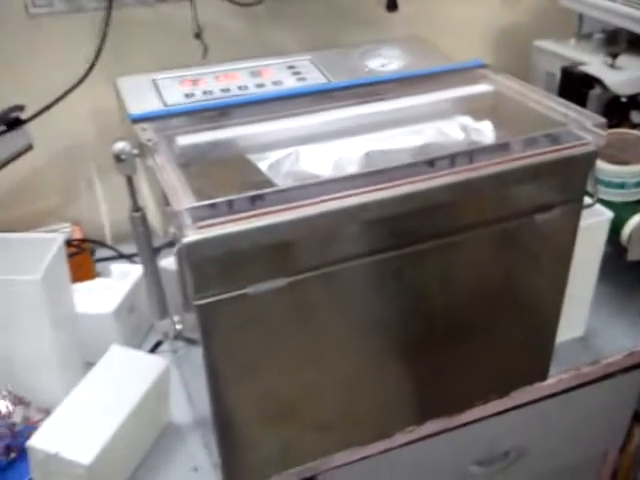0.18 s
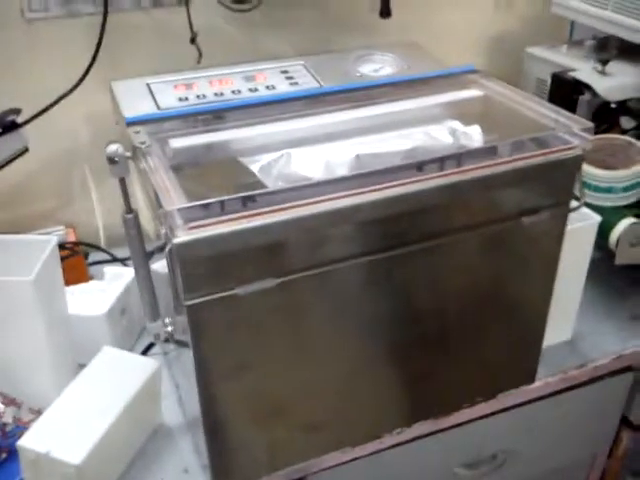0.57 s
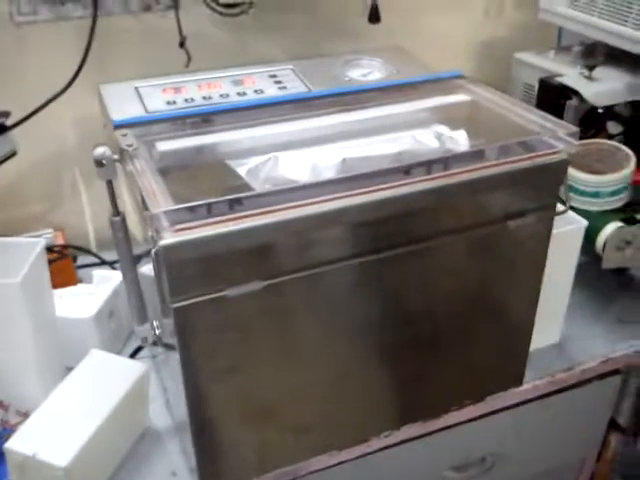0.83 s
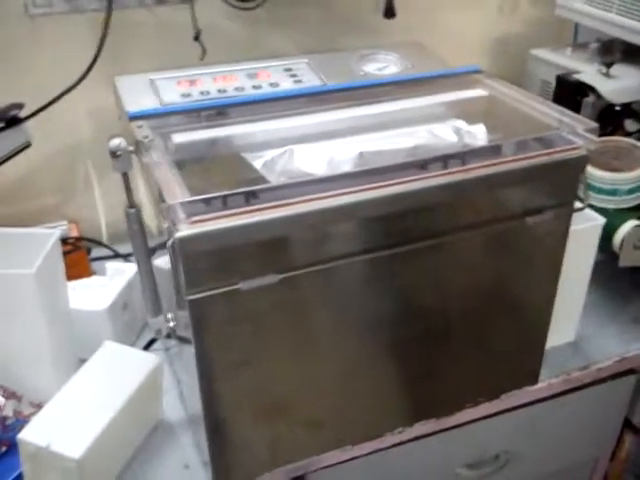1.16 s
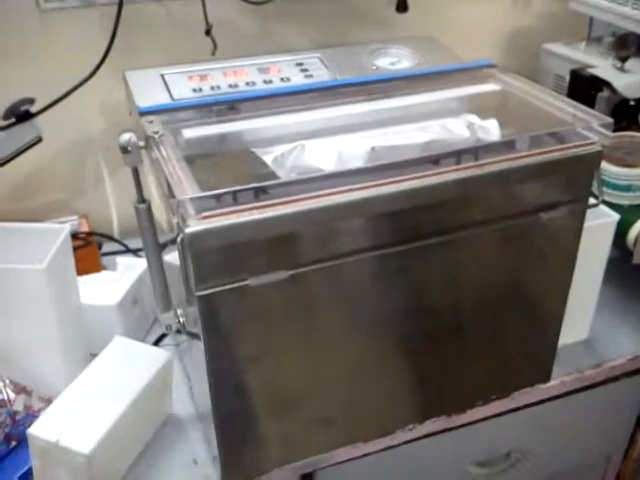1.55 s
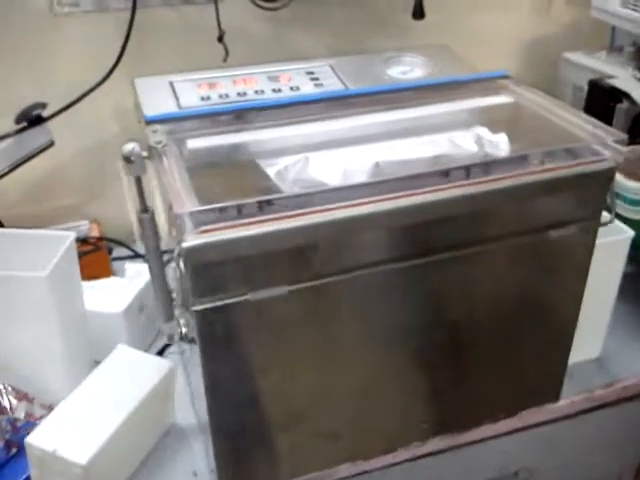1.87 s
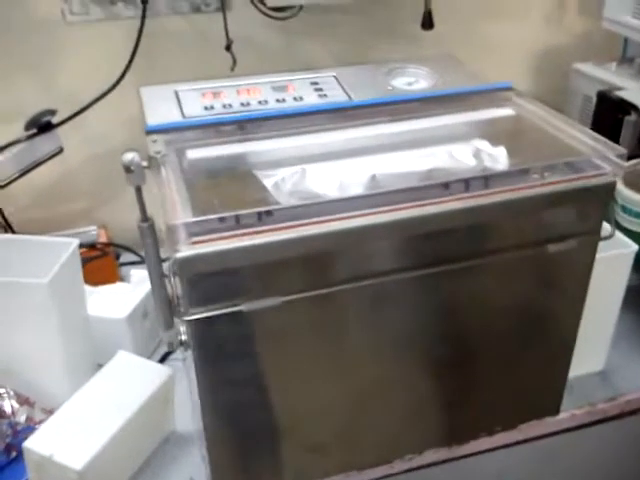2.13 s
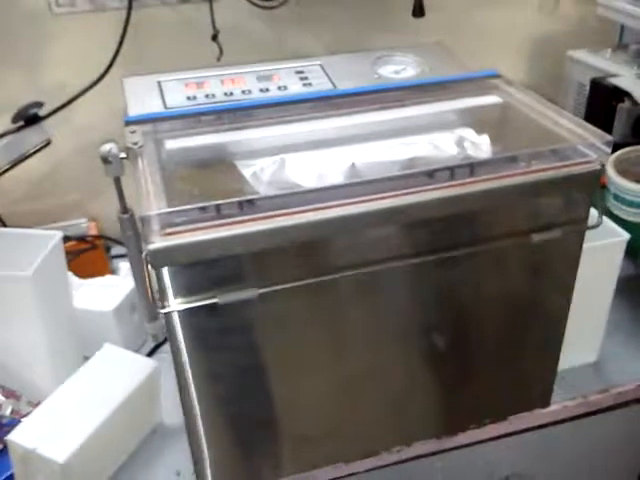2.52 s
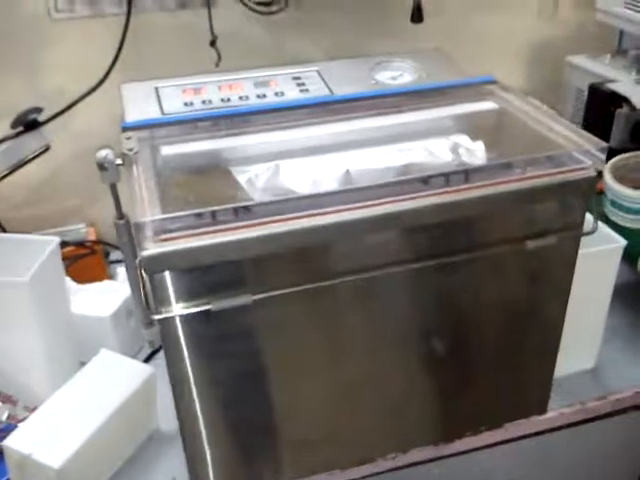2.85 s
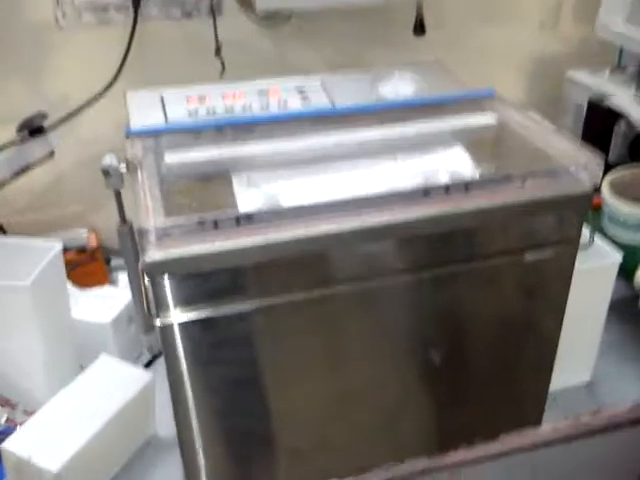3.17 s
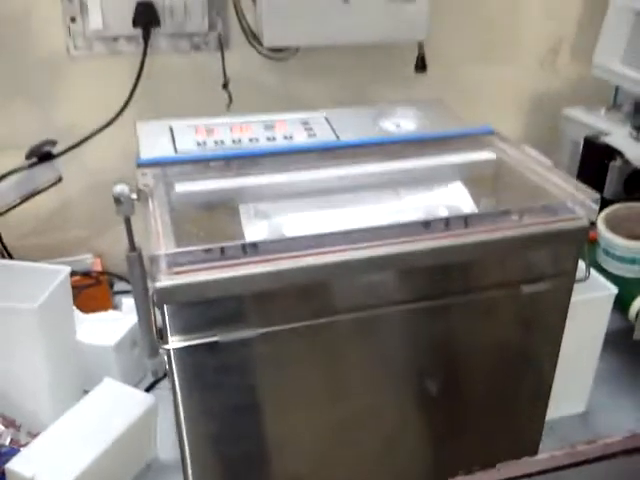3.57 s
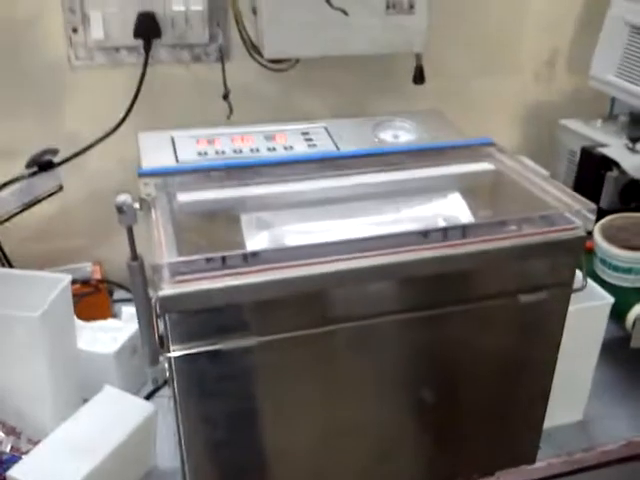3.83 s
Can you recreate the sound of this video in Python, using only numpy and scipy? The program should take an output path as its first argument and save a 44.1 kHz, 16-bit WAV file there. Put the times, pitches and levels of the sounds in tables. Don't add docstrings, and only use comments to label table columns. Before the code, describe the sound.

Vacuum machine's valve slams open late, with a sharp rattling crack and short metallic ring, then harsh, resonant air hiss continuing to the end; before it only low room hum. Small hard-walled workshop, one nearly mono microphone.

```python
import sys
import numpy as np
from scipy import signal
from scipy.fft import rfft, irfft
from scipy.io import wavfile
from scipy.ndimage import uniform_filter1d

SR = 44100
rng = np.random.default_rng(int(sys.argv[2]) if len(sys.argv) > 2 else 0)


def generate_wav(signal):
    frames = np.transpose(np.atleast_2d(signal))
    scaled = np.clip(frames, -1, 1) * 32767
    pcm = np.round(scaled).astype(np.int16)
    wavfile.write(sys.argv[1], SR, pcm)


def level_to_linear(level):
    exponent = np.asarray(level, float) / 20
    return 10 ** exponent


N = 176400
T = np.arange(N) / SR
HZ = np.fft.rfftfreq(N, 1 / SR)
PUSH_S, SLAM_S, BLOW_S = 2.895, 2.9073, 2.9074


def evened(x):
    return x / np.sqrt(np.mean(x ** 2) + 1e-20)


def read(points, hz):
    f, value = np.transpose(points)
    return np.interp(np.log(hz + 1), np.log(f + 1), value)


def coloured(gain):
    return evened(irfft(rfft(rng.standard_normal(N)) * gain, N))


def wander(rate_hz):
    return coloured(1 / (1 + (HZ / rate_hz) ** 2))


def crack():
    # f/Hz, density/dB per Hz
    spectrum = [(80, -11.5), (400, -7), (1000, -2), (3650, 1), (5560, -9), (7250, -8), (11500, -21.5),
                (15000, -11)]
    # f/Hz, T60/s
    decay = [(100, 1), (400, 0.88), (1000, 0.14), (4000, 0.084), (12000, .08)]
    # delay/s, level/dB
    rattle = [
        (.0032, -8.5),
        (0.008, -35),
        (0.025, -15),
        (.043, -13),
    ]
    level_db = -16
    t = np.maximum(T - BLOW_S, 0)
    out = np.zeros(N)
    for hz in np.geomspace(90, 16000, num=12):
        band = np.exp(-(np.log((HZ + 1) / hz) / .35) ** 2)
        gain = band * level_to_linear(read(spectrum, HZ) + level_db)
        noise = irfft(rfft(rng.standard_normal(N)) * gain, N)
        t60_s = read(decay, hz)
        for delay_s, db in [(0, 0), *rattle]:
            late = np.maximum(t - delay_s, 0)
            rise = np.minimum(late * hz, 1)
            out += noise * rise * level_to_linear(db - 60 * late / t60_s)
    return out


def pressure_pulse():
    level_db, length_s = -18, .0004
    x = np.maximum(T - BLOW_S, 0) / length_s
    return -level_to_linear(level_db) * x * (2 - x) * np.exp(1 - x)


def cabinet():
    # f/Hz, level/dB, T60/s, rise/s
    modes = [(112.5, -39, 0.36, 0.03), (152.5, -33, 0.49, 0.0031), (220, -33, .3, 0.025),
             (260.7, -28.5, 0.21, 0.0062), (377, -35, 0.15, 0.0025), (504, -34.5, 0.18, 0.006),
             (584.7, -26, 0.18, 0.021), (808, -26.5, 0.15, 0.0016), (912, -26, 0.086, 0.0014),
             (1265, -25.5, 0.042, 0.0016), (1724, -32, .15, 0.0017), (1935, -35, 0.12, 0.0017),
             (2326, -35, 0.17, 0.0023), (2785, -37.5, 0.21, .002)]
    t = np.maximum(T - BLOW_S, 0)
    out = np.zeros(N)
    for hz, db, t60_s, rise_s in modes:
        out -= np.minimum(t / rise_s, 1) * level_to_linear(db - 60 * t / t60_s) * np.sin(2 * np.pi * hz * t)
    return out


def lid_push():
    hz, level_db, rise_s, t60_s = 129, -27.5, 0.006, 0.2
    t = np.maximum(T - PUSH_S, 0)
    envelope = np.minimum(t / rise_s, 1) * level_to_linear(level_db - 60 * t / t60_s)
    return envelope * np.sin(2 * np.pi * hz * t)


def patchy(x):
    patch_db = .7
    z = signal.stft(x, nperseg=1024, noverlap=768)[2]
    field = rng.standard_normal(z.shape[::-1])
    field = uniform_filter1d(field, size=14, axis=0)
    field = uniform_filter1d(field, size=7, axis=1)
    gain = level_to_linear(patch_db * evened(field).T)
    return evened(signal.istft(z * gain, nperseg=1024, noverlap=768)[1][:N])


def shop_walls():
    t60_s, level_db, gap_s = .2, -11, .004
    t = T[:SR // 2]
    tail = rng.standard_normal(SR // 2) * level_to_linear(-60 * t / t60_s) * (t > gap_s)
    return 1 + level_to_linear(level_db) * rfft(tail / np.linalg.norm(tail), N)


def air():
    # t/s, level/dB
    flow = [
        (2.96, -35.5),
        (2.97, -34.5),
        (3.952, -35.5),
        (4.0, -38),
    ]
    # f/Hz, density/dB per Hz
    jet_spectrum = [(300, -31), (600, -21.5), (1500, -13.5), (2500, -18), (3700, -10.5), (5000, -20.5),
                    (6500, -27), (8500, -23.5)]
    # f/Hz, level over jet top/dB
    whistle = [(8500, 1), (10200, -9), (11300, -9), (12600, 1.5), (13800, -4), (14500, -9), (15000, -10.5),
               (15700, -8)]
    # f/Hz, width/Hz, level/dB
    resonances = [(707.4, 49, -3.5), (1248, 24, -5.5), (1280, 29, -6.5), (1744, 120, -1), (1908, 95, -1),
                  (2030, 37, -11), (2312, 133, -6), (2726, 29, -4.5), (2885, 32, -2.5), (3273, 90, -5),
                  (3595, 140, -7.5), (4200, 65, -7.5), (4536, 67, -4), (5300, 54, -13.5),
                  (5465, 47, -21), (5840, 350, -19.5), (7100, 64, -23), (7970, 200, -21), (8700, 70, -24),
            (9320, 59, -20.5), (9480, 77, -22), (11800, 150, -20.5), (12300, 120, -21), (12400, 60, -22),
            (12790, 80, -23), (13200, 50, -23)]
    flutter_db, lead_s, opening_s = .4, .032, .038
    jet = level_to_linear(read(jet_spectrum, HZ) + read(whistle, HZ)) / (1 + (250 / (HZ + 1)) ** 4)
    body = np.zeros(len(HZ))
    for hz, width_hz, db in resonances:
        body += level_to_linear(db) / (1 + (2 * (HZ - hz) / width_hz) ** 2)
    noise = patchy(coloured(np.hypot(jet, body) * shop_walls()))
    flow_db = np.interp(T, *np.transpose(flow)) + flutter_db * wander(27)
    opening = np.clip((T - SLAM_S + lead_s) / opening_s, 0, 1) ** 2
    return opening * level_to_linear(flow_db) * noise


def tone(hz, db, waver_hz):
    turns = np.cumsum(hz + waver_hz * wander(4.22)) / SR
    return level_to_linear(db + 2.0 * wander(1)) * np.sqrt(2) * np.sin(2 * np.pi * turns)


def hum():
    # f/Hz, level/dB rms, waver/Hz
    tones = [(99.7, -61, 0.74), (295, -88.5, 4.4), (380, -69.5, 9), (199, -70, 4.09)]
    return sum(tone(*row) for row in tones)


def compressor():
    # t/s, level/dB
    drone = [
        (0.0, -60.5),
        (0.27, -56),
        (0.46, -60),
        (0.95, -55.5),
        (1.28, -65),
        (1.95, -59.5),
        (3.35, -59.5),
        (3.61, -57),
        (4.0, -57.5),
    ]
    # f/Hz, level/dB, waver/Hz
    tones = [(39.5, -1.5, 3.9), (55, -3.5, 9.3), (22, -7, 3.94)]
    return level_to_linear(np.interp(T, *np.transpose(drone))) * sum(tone(*row) for row in tones)


def rustles():
    # t/s, length/s, level/dB, low f/Hz, high f/Hz
    events = [
        (0.396, 0.0048, -62, 6000, 9000),
        (1.562, 0.07, -66.5, 2000, 14900),
    ]
    out = np.zeros(N)
    for s, length_s, db, low_hz, high_hz in events:
        band = 1 / (1 + (low_hz / (HZ + 1)) ** 8) / (1 + (HZ / high_hz) ** 8)
        swell = np.sin(np.pi * np.clip((T - s) / length_s, 0, 1))
        out += level_to_linear(db) * swell * coloured(band)
    return out


def fans():
    # f/Hz, density/dB per Hz
    spectrum = [(80, -2.5), (130, -6), (380, -5.5), (710, -9), (1210, -9), (2500, -19), (4200, -25.5),
                (5000, -33.5)]
    # t/s, level/dB
    activity = [
        (0, 0.5),
        (1, 1),
        (2.2, 0),
        (2.8, -0.5),
        (4, 0),
    ]
    shape = level_to_linear(read(spectrum, HZ)) / (1 + (60 / (HZ + 1)) ** 2) / (1 + (HZ / 6000) ** 6)
    level_db = -51 + np.interp(T, *np.transpose(activity)) + .5 * wander(2.8)
    return level_to_linear(level_db) * coloured(shape)


def microphone_hiss():
    # f/Hz, density/dB per Hz
    spectrum = [(2000, -3.5), (6000, 1), (8000, -2), (11000, -5), (15700, -7)]
    return level_to_linear(-71) * coloured(level_to_linear(read(spectrum, HZ)))


def scene():
    # f/Hz, side over mid/dB
    side_db = [(60, -58), (150, -56), (380, -38), (950, -36.5), (2380, -35), (5980, -20.5), (15000, -20.5)]
    slam = crack() + pressure_pulse() + cabinet() + lid_push()
    workshop = hum() + compressor() + rustles() + fans() + microphone_hiss()
    mid = slam + air() + workshop
    side = irfft(rfft(np.roll(mid, 300)) * level_to_linear(read(side_db, HZ)), N)
    return np.array([mid + side, mid - side])


def treble_losses(x):
    start_s = (.558, 2.86)
    lengths_s = (.04, .022)
    low_hz = (8300, 9800)
    kept = x
    for s, length_s, hz in zip(start_s, lengths_s, low_hz):
        treble = irfft(rfft(x, axis=1) / (1 + (hz / (HZ + 1)) ** 30), N, axis=1)
        fade = np.clip(np.minimum(T - s, s + length_s - T) / .004, 0, 1)
        kept = kept - fade * treble
    return kept


def gated(x):
    # f/Hz, level under neighbours/dB
    limit = [(4300, -12), (4800, -9.5), (5300, -14), (6500, -9.5), (9000, -8), (11000, -8), (13000, -4.5),
             (15000, -5)]
    chance_db, thin_db, edge_hz = 2.8, -6.5, 15740
    hz, t, z = signal.stft(x, SR, nperseg=2048, noverlap=1536)
    starts = np.unique(np.round(np.geomspace(180, 1024, num=48)).astype(int))
    band = np.clip(np.searchsorted(starts, np.arange(len(hz)), side="right") - 1, 0, None)
    power = uniform_filter1d(abs(z[0]) ** 2, size=2, axis=1)
    widths = np.diff(starts, append=len(hz))[:, None]
    own = (np.add.reduceat(power, starts, axis=0) / widths)[band]
    around = abs(uniform_filter1d(power, size=180, axis=0)) + 1e-20
    draws = rng.standard_normal((len(t) // 3 + 1, len(starts)))
    chance = np.repeat(draws, 3, axis=0)[:len(t), band].T
    margin_db = 10 * np.log10(own / around + 1e-9) - read(limit, hz)[:, None] - chance_db * chance
    strong = power > level_to_linear(2 * thin_db) * np.sqrt(around * own)
    keep = np.where(hz[:, None] > limit[0][0], np.clip(10 * margin_db * strong, .01, 1), 1)
    kept = signal.istft(z * keep, SR, nperseg=2048, noverlap=1536)[1][:, :N]
    return irfft(rfft(kept, axis=1) * np.clip((edge_hz - HZ) / 60, 0, 1), N, axis=1)


def low_pass(x):
    return signal.sosfilt(signal.butter(12, 16510, fs=SR, output="sos"), x)


def record(dry):
    offset = .0009
    mix = gated(treble_losses(dry)) + offset
    return low_pass(mix)


dry = scene()
out = record(dry)
generate_wav(out)
```